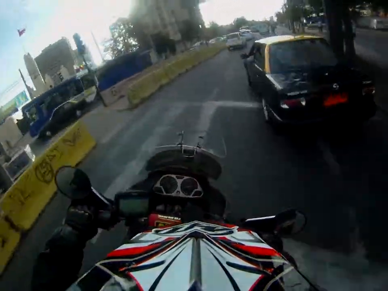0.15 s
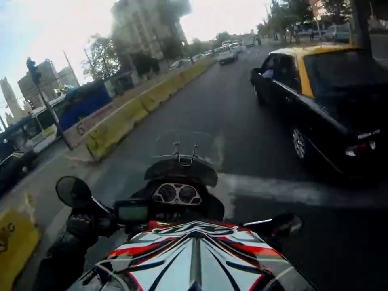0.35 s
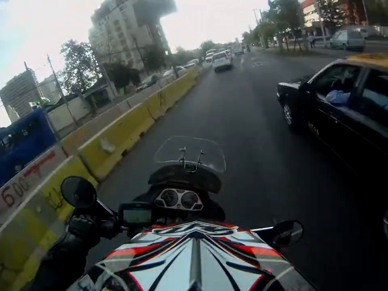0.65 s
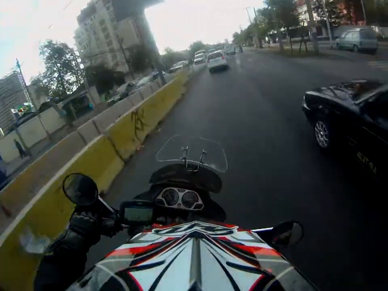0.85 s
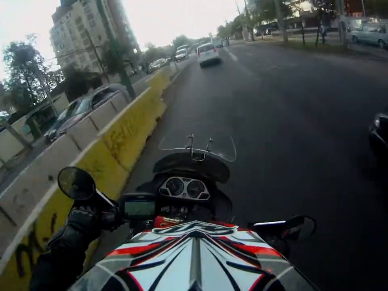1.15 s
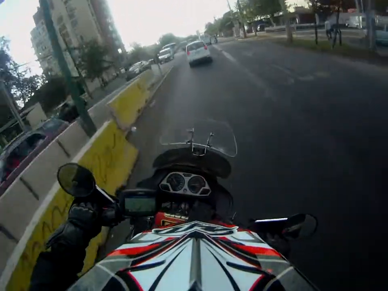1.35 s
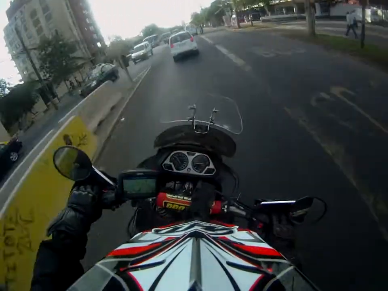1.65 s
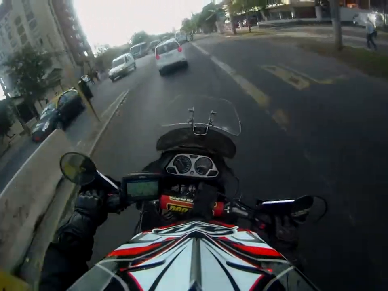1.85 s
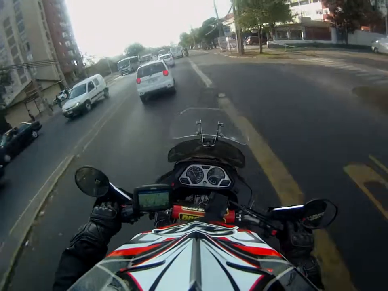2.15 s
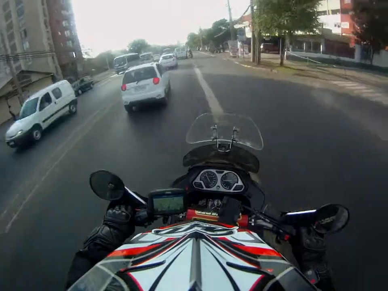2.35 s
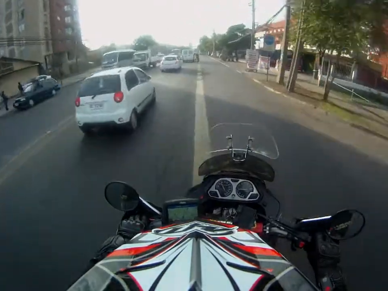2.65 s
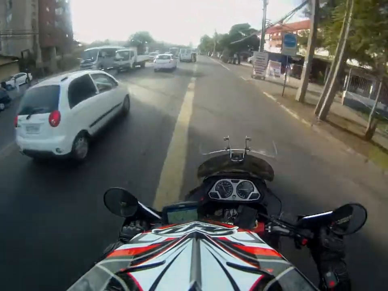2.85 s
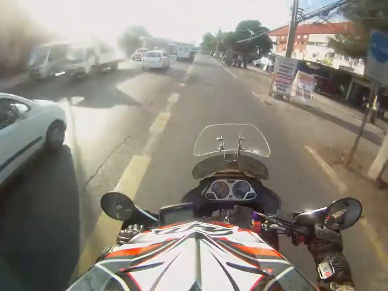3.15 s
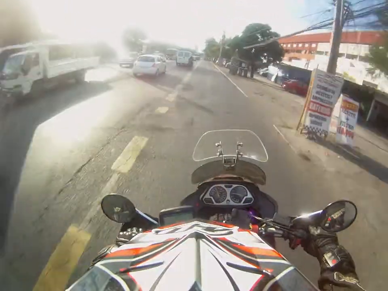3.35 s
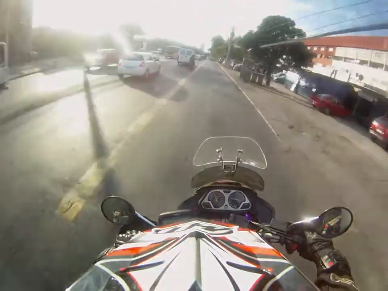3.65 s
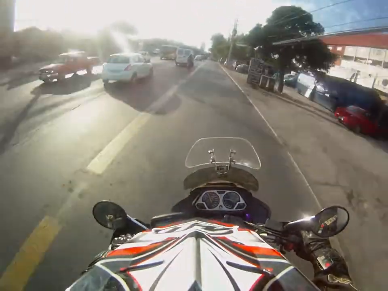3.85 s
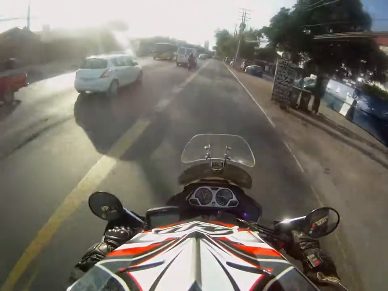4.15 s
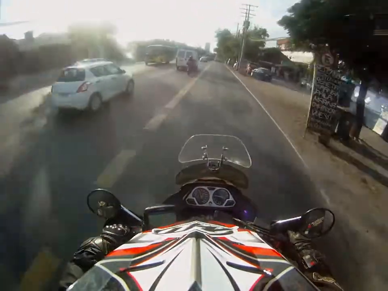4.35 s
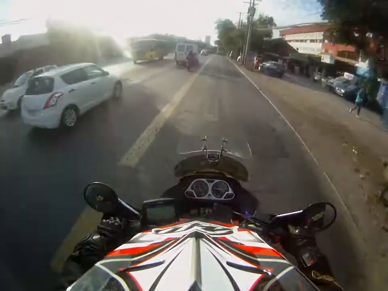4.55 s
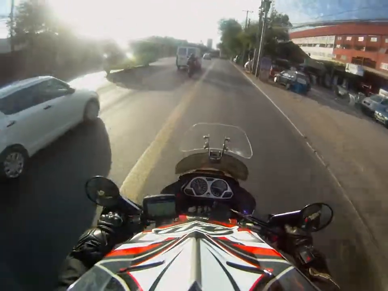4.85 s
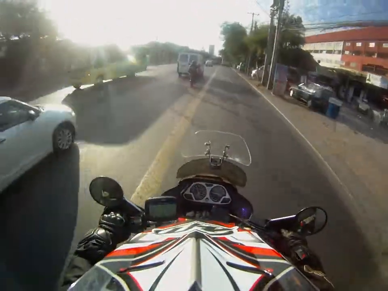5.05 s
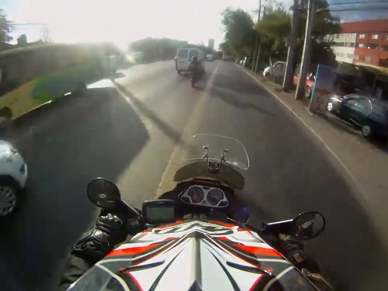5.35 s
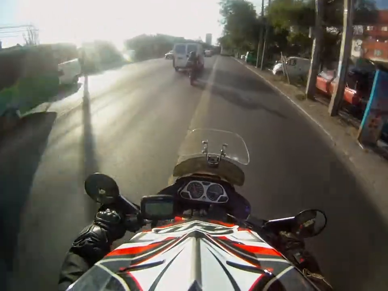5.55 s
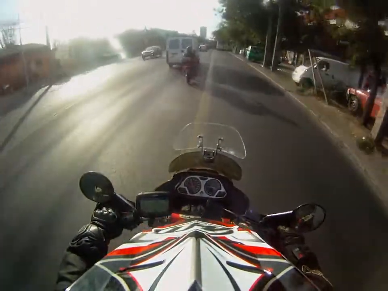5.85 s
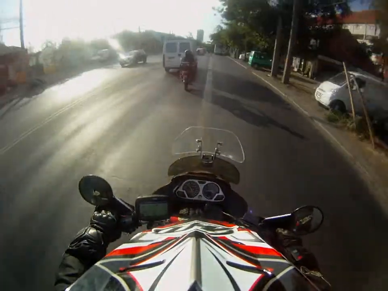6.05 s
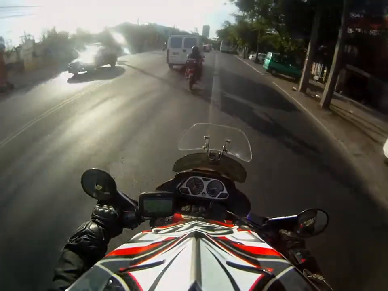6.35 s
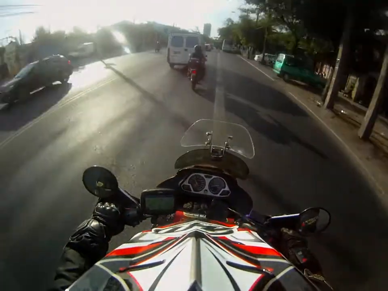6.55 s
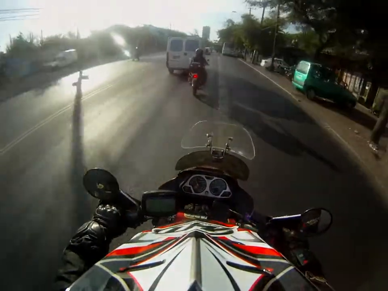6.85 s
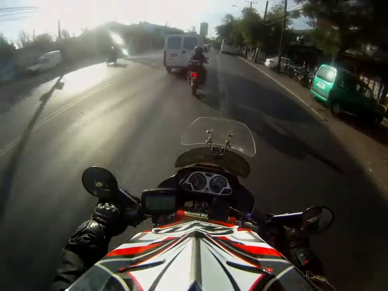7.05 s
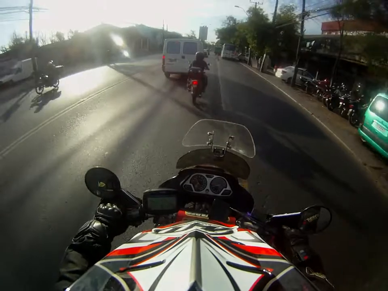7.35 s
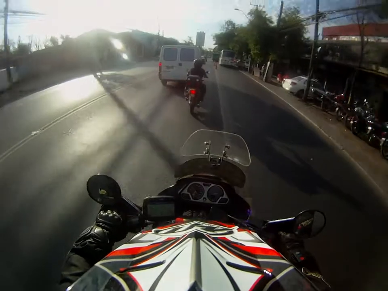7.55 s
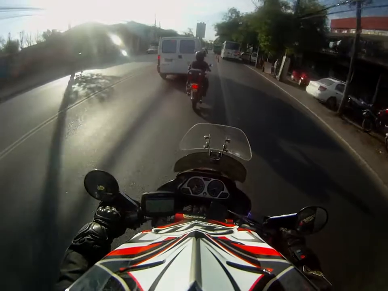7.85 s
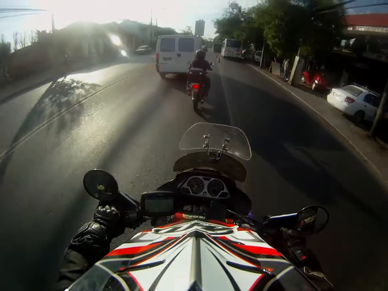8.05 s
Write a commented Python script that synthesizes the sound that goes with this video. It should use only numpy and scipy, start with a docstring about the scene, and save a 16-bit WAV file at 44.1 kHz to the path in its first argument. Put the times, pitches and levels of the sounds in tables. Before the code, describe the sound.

Outdoor city road, heard through a closed camera case on a moving rider. Steady wind noise with hollow booms and short buffets covers a motorcycle engine that accelerates for three seconds, whining upward, then gradually slows. Tyres roar under the loudest wind. Towards the end the airflow gusts and drops away, with thin high squeals and brief singing tones from the drive train.

```python
"""A twin-cylinder motorcycle pulls away: exhaust hum and valve clatter swell with the throttle, gears whine upward.
Wind rushes over the helmet throughout, coloured by a closed camera case; one airflow drives rush, boom and rumble.
Tyres roar under it, from filtered noise; from the first second on, short wind buffets strike as dying noise bursts.
Past three seconds the engine slows and the airflow is at its strongest, gusting and dropping away.
From five seconds brakes squeal and the drive train sings in gliding tones, as throttle and wind die down."""
import sys
import numpy as np
from scipy import signal
from scipy.fft import rfft, irfft
from scipy.io import wavfile
from scipy.ndimage import uniform_filter1d

SR = 44100
rng = np.random.default_rng(int(sys.argv[2]) if len(sys.argv) > 2 else 0)


def materialize(psi):
    """Save the field psi as 16-bit PCM at rate SR to the path in sys.argv[1].

    A 1-D psi becomes a single channel; in a 2-D psi each row is a channel.
    """
    bounded = np.clip(np.atleast_2d(psi).T, -1, 1)
    quanta = np.round(bounded * 32767).astype(np.int16)
    wavfile.write(sys.argv[1], SR, quanta)


N = 362502
TIME = np.arange(N) / SR
FREQS = np.maximum(np.fft.rfftfreq(N, 1 / SR), 1)  # at least 1 Hz, for the log axis


def undb(db):
    """Decibels to gain."""
    return 10 ** (np.asarray(db) / 20)


def unit(x):
    """Scale to rms 1."""
    return x / np.sqrt(np.mean(x ** 2))


def curves(table):
    """Each column of a timed table as a curve, one value a sample."""
    times, *columns = np.transpose(table)
    return [np.interp(TIME, times, column) for column in columns]


def slope(points):
    """A spectrum in dB, joined on a log-frequency axis."""
    hz, db = np.transpose(points)
    return np.interp(np.log(FREQS), np.log(hz), db)


def shape(x, gain):
    """Filter by a gain per frequency, then scale to rms 1."""
    return unit(irfft(rfft(x) * gain, N))


def noise():
    """White noise."""
    return rng.standard_normal(N)


def walk(rate):
    """Random wandering of rms 1: `rate` random points a second, joined by straight lines."""
    points = rng.standard_normal(N // 8)
    return unit(np.interp(TIME * rate, np.arange(len(points)), points))


def resonance(hz, centre_hz, width_hz):
    """Bell-shaped response, 1 at the centre and half at the edges of its width."""
    return 1 / (1 + (2 * (hz - centre_hz) / width_hz) ** 2)


# smooth response of the camera case: (frequency [Hz], level [dB])
CASE_RESPONSE = [(25, -24.5), (90, -10), (220, -14.5), (390, -16), (540, -10), (850, -10.5), (1350, -15),
                 (1570, -5), (2250, 1), (3900, -8.5), (5150, -6.5), (5750, -18), (7900, -23.5), (8800, -32),
                 (15000, -36)]
# resonances of the case walls and the air inside: (centre [Hz], width [Hz], lift [dB])
CASE_RESONANCES = [(489, 41, 5), (574.6, 72, 6.5), (659, 102, 7), (729, 26, 5.5), (977, 72, 3.5),
                   (1640, 72, 4.5), (2360, 110, 2), (2510, 110, -2), (2687, 43, 6), (2905, 81, 4),
                   (3216, 130, 3.5), (3436, 107, 8.5), (4180, 65, 4), (4650, 140, 3.5), (4883, 120, 6.5),
                   (6640, 130, 3.5), (7420, 200, 5), (10200, 650, 2.5)]


def through_case(x, colour):
    """A source of the given colour, heard through the resonant camera case, at rms 1."""
    lift_db = sum(db * resonance(FREQS, hz, width) for hz, width, db in CASE_RESONANCES)
    return shape(x, undb(slope(CASE_RESPONSE) + lift_db + slope(colour)))


# resonances of the exhaust pipe: (centre [Hz], width [Hz], relative level [dB])
PIPE_RESONANCES = [(89, 22, 1.5), (244, 51, 1), (472, 150, -6.5)]


def exhaust(turns, crank_hz, uneven_db=0.5, count=10):
    """Twin firing over two turns gives half multiples too; each swells as it crosses a pipe resonance."""
    hum = 0
    for multiple in np.arange(2, count) / 2:  # 1, 1.5, 2 ... 4.5 times the crank rate
        line_hz = multiple * crank_hz
        pipe = sum(undb(db) * resonance(line_hz, hz, width) for hz, width, db in PIPE_RESONANCES)
        tone = np.sin(2 * np.pi * (multiple * turns + rng.random()))
        hum = hum + pipe * undb(uneven_db * walk(4)) * tone
    return unit(hum)


# colour the clatter sends to the case: (frequency [Hz], level [dB])
CLATTER_SPECTRUM = [(25, -8), (200, 0.5), (330, 1.5), (600, -11), (1100, 6.5), (1700, 6), (2400, -9),
                    (3400, -0.5), (5000, -6.5), (9500, 3), (15000, 2)]


def clatter(turns, decay_turns=0.51, scatter_db=2, wash=0.86):
    """Valves and pistons knock once a turn, each at a chance strength, over a wash of chain noise."""
    strengths = undb(scatter_db * rng.standard_normal(N // 100))
    knocks = strengths[turns.astype(int)] * np.exp(-(turns % 1) / decay_turns)
    return through_case(noise() * (wash + knocks), CLATTER_SPECTRUM)


# gear meshes and their sidebands: (multiple of the crank rate, relative level [dB],
# smear over the clean line [dB], smear rate [Hz], loudest at [Hz], width [Hz])
GEAR_MESHES = [(10.91, -17.5, -2, 120, 1010, 110), (12.35, -14.5, 0, 100, 1200, 230),
               (11.94, 0, -3.5, 150, 1490, 130), (15.5, -7.5, 1, 200, 1570, 160),
               (18.52, -6, 8, 130, 1760, 480), (19.5, -8, 3, 120, 2100, 900),
               (20, -7, -5.5, 100, 2030, 770), (20.7, -7, 0, 170, 1700, 500), (39.3, -5, 8, 350, 3490, 300),
               (37.76, -5, 14, 480, 3870, 600)]


def gears(turns, crank_hz, throb=0.1, rattle_db=1.0):
    """Meshing teeth whine where the housing rings; backlash smears each line and firings make it throb."""
    whine = 0
    for multiple, db, smear_db, smear_hz, hz, width in GEAR_MESHES:
        # a complex random sway blurs both strength and phase
        sway = 1 + undb(smear_db) * (walk(smear_hz) + 1j * walk(smear_hz)) / np.sqrt(2)
        mesh = unit(np.real(sway * np.exp(2j * np.pi * multiple * turns)))
        whine = whine + undb(db) * resonance(multiple * crank_hz, hz, width) * mesh
    throbbing = 1 + throb * np.sin(np.pi * turns)  # one throb in two turns
    return unit(whine * throbbing * undb(rattle_db * walk(90)))


# engine speed: (time [s], crank rate [Hz])
CRANK_RATE = [(0, 86.7), (.9, 88.2), (1.5, 96.3), (1.75, 100.5), (2.1, 104.2), (2.5, 110.3), (3, 119.9),
              (3.4, 125.2), (4, 118.3), (4.8, 112.5), (5.5, 99.8), (6.35, 87.2), (6.9, 80.9), (7.5, 86),
              (8.22, 84.4)]
# the rider's hand: (time [s], throttle [0-1])
THROTTLE_HAND = [(0, 0.07), (.9, 0.23), (1.6, 0.78), (2.3, 1), (2.95, 0.92), (3.5, 0.45), (5, 0.33),
                 (5.6, 0.57), (6.2, 0.18), (8.22, 0.09)]
# gear whine, loudest while pulling away: (time [s], level [dB])
GEAR_LEVEL = [(0, -58.5), (.6, -54.5), (1.8, -52), (2.5, -55), (3.5, -66), (5, -59), (6.3, -61), (7, -61),
              (7.37, -59), (7.6, -67), (8.22, -75)]
# levels with the throttle shut, and what full throttle adds [dB]
EXHAUST_DB, EXHAUST_LOAD_DB = -82, 17.5
CLATTER_DB, CLATTER_LOAD_DB = -57, 7.5


def engine():
    """The crank sets every pitch; the throttle brings up the clatter and, near full load, the exhaust."""
    crank_hz, = curves(CRANK_RATE)
    throttle, = curves(THROTTLE_HAND)
    gear_db, = curves(GEAR_LEVEL)
    turns = np.cumsum(crank_hz * (1 + 0.00196 * walk(25))) / SR  # the crank runs slightly unsteadily
    exhaust_db = EXHAUST_DB + EXHAUST_LOAD_DB * throttle ** 2
    clatter_db = CLATTER_DB + CLATTER_LOAD_DB * throttle
    return (undb(exhaust_db) * exhaust(turns, crank_hz)
            + undb(clatter_db) * clatter(turns)
            + undb(gear_db) * gears(turns, crank_hz))


# colour the wind sends to the case: (frequency [Hz], level [dB])
WIND_SPECTRUM = [(25, -6), (60, -1.5), (200, -1.5), (330, -1.5), (600, 0), (1100, -3), (1700, 1.5),
                 (2500, -2.5), (5000, 2), (15000, 0.5)]


def wind(flutter_db=1.0, flutter_hz=45, eddy_db=0.5, eddy_hz=420):
    """Turbulence off the windscreen scrubs the case: big eddies flutter, small ones roughen it."""
    eddies = undb(flutter_db * walk(flutter_hz) + eddy_db * walk(eddy_hz))
    return through_case(noise() * eddies, WIND_SPECTRUM)


def boom(hz=139, width_hz=36, steadiness=0.4):
    """Buffeting keeps a hollow resonance of the helmet sounding, its natural swelling partly evened out."""
    ring = shape(noise(), resonance(FREQS, hz, width_hz))
    swell = np.sqrt(uniform_filter1d(ring ** 2, SR // 8))
    return unit(ring / swell ** steadiness)


def rumble(hz=45, width_hz=70):
    """Deep noise of tyres and passing air."""
    return shape(noise(), resonance(FREQS, hz, width_hz))


def swells(table, squareness=3.4):
    """Short bumps in dB; squareness 2 is a rounded swell, more gives a flat top and quick edges."""
    return sum(db * .5 ** (abs(2 * (TIME - middle) / length) ** squareness) for middle, length, db in table)


# airflow at the helmet beneath the gusts: (time [s], wind level [dB])
STEADY_AIRFLOW = [(0, -54.5), (.8, -50), (1.4, -50), (2.1, -47.5), (2.6, -46.5), (3.1, -42), (3.5, -41),
                  (4, -45), (4.6, -42), (5, -47), (5.85, -48), (6.3, -54), (6.85, -53.5), (7.42, -62.5),
                  (7.65, -54), (8.22, -58)]
# gusts on top of it: (middle [s], length [s], lift [dB])
AIR_GUSTS = [(.14, 0.1, 3), (2.82, 0.048, 2), (4.19, 0.12, 2.5), (4.44, 0.13, 1), (5.33, 0.44, 6.5),
             (6.52, .28, 6.5), (6.87, 0.048, 3)]
# short drops of the rush, a negative one lifting it: (middle [s], length [s], drop [dB])
AIR_LULLS = [(4.02, 0.11, 1), (4.32, 0.12, 4), (4.78, 0.035, 4), (5.025, 0.064, 10), (6.14, 0.08, 7),
             (6.32, .05, 5), (6.74, .06, -0.5), (7.45, 0.07, 0)]
# strong eddies thump the helmet: (middle [s], length [s], boom lift [dB])
HELMET_THUMPS = [(.18, .25, 5), (.78, 0.23, 5.5), (1.29, 0.22, 7.5), (2.85, .1, 6), (3.17, .1, 4.5),
                 (3.57, 0.092, 4), (4.43, .08, 4), (4.76, .08, 5), (5, 0.063, 7), (5.42, .12, 4),
                 (5.93, 0.12, 6), (6.53, 0.078, 3.5), (7.54, 0.068, 9)]
CRUISE_DB = -43  # wind level at cruising airflow
# levels at cruising airflow [dB], and dB gained per dB of wind
BOOM_DB, BOOM_PER_WIND = -60.5, 0.73
RUMBLE_DB, RUMBLE_PER_WIND = -70, 0.52


def air(unrest_db=0.77, unrest_hz=14):
    """One airflow drives rush, boom and rumble; gusts lift rush and boom, lulls act only on the rush."""
    flow_db, = curves(STEADY_AIRFLOW)
    gust_db = flow_db + swells(AIR_GUSTS)
    rush_db = gust_db - swells(AIR_LULLS) + unrest_db * walk(unrest_hz)
    boom_db = BOOM_DB + BOOM_PER_WIND * (gust_db - CRUISE_DB) + swells(HELMET_THUMPS)
    rumble_db = RUMBLE_DB + RUMBLE_PER_WIND * (flow_db - CRUISE_DB)
    return undb(rush_db) * wind() + undb(boom_db) * boom() + undb(rumble_db) * rumble()


# tyre roar: (time [s], level [dB])
TYRE_LEVEL = [(0, -71), (1.7, -77), (2.7, -58.5), (3.55, -56), (5.3, -58.5), (5.8, -64), (7.4, -69),
              (8.22, -64.5)]
# colour the tyres send to the case: (frequency [Hz], level [dB])
TYRE_SPECTRUM = [(25, -15), (250, -3), (450, -4), (600, 1.5), (900, -2), (1300, 7), (2000, -19.5),
                 (15000, -22)]


def tyres():
    """Tread roars on the asphalt: noise through the case, riding a level curve."""
    tyre_db, = curves(TYRE_LEVEL)
    return undb(tyre_db) * through_case(noise(), TYRE_SPECTRUM)


# whine of the camera's electronics: (frequency [Hz], level [dB])
ELECTRONIC_TONES = [(7838, -81.5), (7865, -80.5), (7897, -80), (14987, -83)]


def electronics(hiss_db=-72, side_db=-6, drift_hz=2):
    """The camera's own faint hiss and drifting whine; only treble hiss differs between the channels."""
    whine = 0
    for hz, db in ELECTRONIC_TONES:
        phase = 2 * np.pi * np.cumsum(hz + drift_hz * walk(17)) / SR
        whine = whine + undb(db) * np.sqrt(2) * np.sin(phase)
    # (frequency [Hz], level [dB])
    treble = [(3500, -32), (4800, -15), (6000, -11.5), (8000, 7.0), (10000, 13), (15000, 10.5)]
    side = shape(noise(), undb(slope(treble)))
    opposed = side * np.array([[1], [-1]])  # added left, subtracted right
    return whine + undb(hiss_db) * (noise() + undb(side_db) * opposed)


# short buffets of wind strike the camera case: (time [s], decay [s], level [dB])
CASE_BUFFETS = [(0.773, 0.013, -44), (1.625, 0.0043, -43), (1.728, 0.0045, -48), (2.07, 0.025, -44),
                (3.7612, 0.0013, -33), (5.0565, 0.023, -48.5), (6.577, 0.0086, -41.5), (6.853, .0015, -43)]
# colour of those buffets: (frequency [Hz], level [dB])
BUFFET_SPECTRUM = [(100, -20), (600, -1), (1700, 2), (15000, 3)]


def case_buffets():
    """Short buffets of wind strike the camera case: noise bursts that start at once and die away."""
    bursts = sum(undb(db) * (TIME >= start) * np.exp(-abs(TIME - start) / decay)
                 for start, decay, db in CASE_BUFFETS)
    return bursts * through_case(noise(), BUFFET_SPECTRUM)


def glides(table, waver, waver_hz):
    """Short wavering tones that slide in pitch, swell and fade."""
    tones, unrest = np.zeros(N), 1 + waver * walk(waver_hz)
    for start, length, from_hz, to_hz, db in table:
        along = np.clip((TIME - start) / length, 0, 1)
        hz = (from_hz + (to_hz - from_hz) * along) * unrest
        swell = np.sqrt(2) * np.sin(np.pi * along)
        tones += undb(db) * swell * np.sin(2 * np.pi * np.cumsum(hz) / SR)
    return tones


# thin brake squeals: (start [s], length [s], start pitch [Hz], end pitch [Hz], level [dB])
BRAKE_SQUEALS = [(5.2, 0.34, 12630, 12350, -73), (5.48, 0.3, 12350, 12030, -82),
                 (6.1, .18, 13760, 13600, -76)]


def squeals():
    """Brakes squeal as thin, high gliding tones with a fast waver."""
    return glides(BRAKE_SQUEALS, waver=.013, waver_hz=900)


# brief drive-train tones: (start [s], length [s], start pitch [Hz], end pitch [Hz], level [dB])
DRIVE_WHINES = [(5.68, 0.68, 328.3, 294, -78.5), (5.72, 0.62, 885, 784, -69),
                (6.33, 0.046, 1673, 1720, -48.5), (6.9, 0.29, 1540, 1534, -63),
                (7.33, 0.1, 3270, 3264, -64), (7.36, 0.043, 1673, 1660, -52.5),
                (7.46, 0.19, 1380, 1440, -64.5), (7.68, 0.19, 1470, 1510, -62),
                (7.86, 0.19, 1455, 1437, -65), (8.05, 0.3, 1383, 1377, -63.5)]


def whines():
    """The drive train sings briefly in gliding tones as the throttle closes."""
    return glides(DRIVE_WHINES, waver=0.0056, waver_hz=157.4)


def scene():
    """Engine, wind, road and small sounds of the ride, all at the one microphone."""
    small = case_buffets() + squeals() + whines()
    return engine() + air() + tyres() + electronics() + small


def record(dry):
    """The camera cuts the top steeply above 15.3 kHz."""
    low_pass = signal.ellip(12, .1, 70, 15300, fs=SR, output="sos")  # .1 dB ripple, 70 dB rejection
    return signal.sosfilt(low_pass, dry)


dry = scene()
out = record(dry)
materialize(out)
```